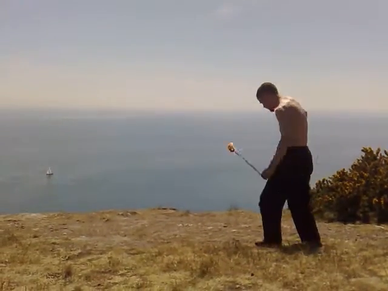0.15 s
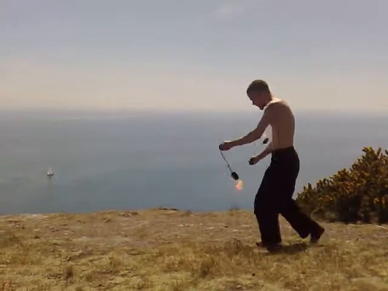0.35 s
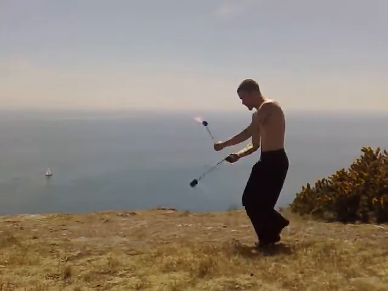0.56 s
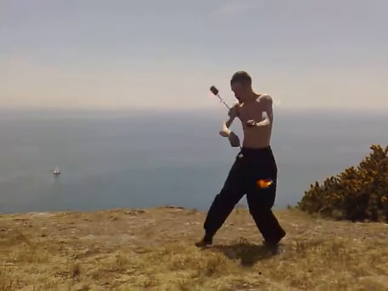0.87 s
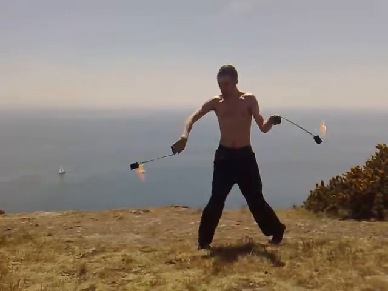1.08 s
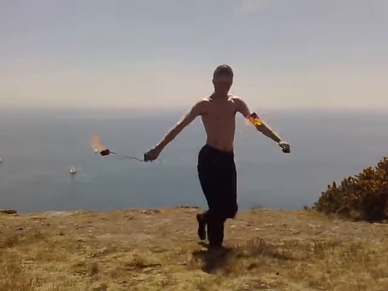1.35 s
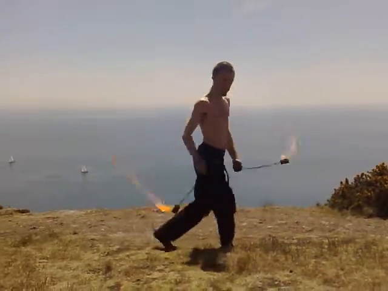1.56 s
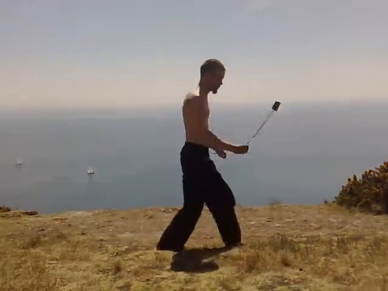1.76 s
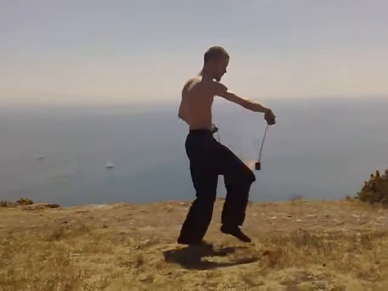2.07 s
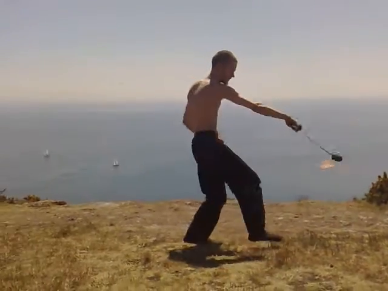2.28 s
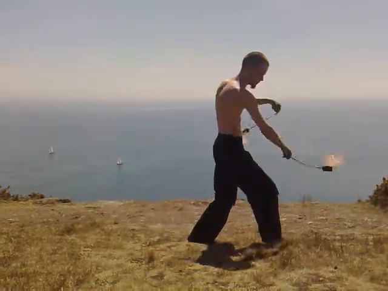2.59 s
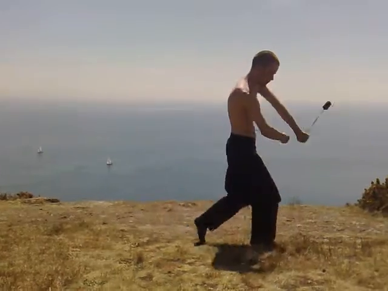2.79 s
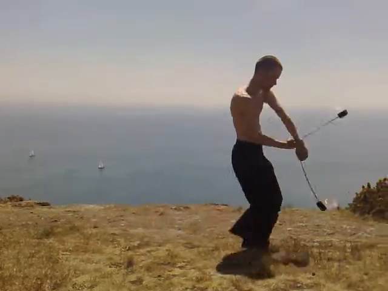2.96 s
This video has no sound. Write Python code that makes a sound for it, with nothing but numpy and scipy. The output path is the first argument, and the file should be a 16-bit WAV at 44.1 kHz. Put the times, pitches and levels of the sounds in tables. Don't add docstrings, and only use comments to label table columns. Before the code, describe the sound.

Spinning fire whooshes past in fluttering low gusts, roaring and tearing with each fast swing.

```python
import sys
import numpy as np
from scipy import signal
from scipy.io import wavfile

SR = 44100
rng = np.random.default_rng(int(sys.argv[2]) if len(sys.argv) > 2 else 0)


def attenuation_scalar(level_db):
    decades = np.asarray(level_db, float) / 20
    return 10 ** decades


def int16_out(signal):
    q = np.round(np.clip(np.atleast_2d(signal).T, -1, 1) * 32767)
    wavfile.write(sys.argv[1], SR, q.astype(np.int16))


N = 138033

# t/s, level/dB
TEARING_SWING = [(0.0, -52.5), (0.12, -60), (0.3, -48), (0.38, -65.5), (0.59, -65), (0.69, -50.5),
                 (0.97, -45.5), (1.08, -49.5), (1.13, -43), (1.66, -66.5), (1.72, -50.5), (1.9, -41),
                 (2.07, -56.5), (2.25, -51.5), (2.53, -63), (2.89, -59.5), (2.93, -49.5), (3.13, -54)]


def rms_one(x):
    return x / np.sqrt(np.mean(x ** 2) + 1e-20)


def in_time(rows):
    s, *columns = np.transpose(rows)
    return [np.interp(np.arange(N) / SR, s, column) for column in columns]


def lowpass(x, cut_hz, run=signal.sosfilt):
    return run(signal.butter(2, cut_hz, fs=SR, output="sos"), x)


def drift(rate):
    r = np.exp(-40 * np.pi * rate / SR)
    white = rng.standard_normal(N // 20 + 4002)
    slow = signal.lfilter([1], [1, -2 * r, r * r], white)[4000:]
    return np.interp(np.arange(N) / 20, np.arange(len(slow)), rms_one(slow))


def banded(colour, shared_db, own_db, grain_db, rate):
    hz, db = np.transpose(colour)
    band_edges = 18 * 2 ** np.arange(0, 10.1, 1 / 3)
    white = rng.standard_normal((2, N + 8000))
    together = shared_db * drift(rate) + grain_db * drift(120)
    out = 0
    for k, (low, high) in enumerate(zip(band_edges, band_edges[1:])):
        own = own_db * drift(rate)
        if hz[0] * .8 < low < hz[-1] * 1.1:
            sos = signal.butter(2, [low, high], "band", fs=SR, output="sos")
            band = signal.sosfilt(sos, white[k % 2])[8000:]
            colour_db = np.interp(np.log(low * high) / 2, np.log(hz), db)
            out = out + band * attenuation_scalar(colour_db + together + own)
    return rms_one(out)


def pulse(width_s):
    t = np.arange(-600, 601) / SR / width_s
    bump = np.exp(-np.abs(t) ** 1.6)
    dip = np.exp(-((t - .6) / 2.8) ** 2)
    shape = bump - dip * bump.sum() / dip.sum()
    return shape / shape.max()


def ground(x):
    # t/s, first notch f/Hz, echo level/dB
    turf_echo = [(0, 463, -8), (.2, 535, -6.5), (.65, 540, -3.5), (.8, 465, -12), (1.3, 516, -20),
                 (1.42, 580, -1.5), (1.58, 389, -3), (1.75, 510, 1), (1.95, 474, -18), (2.15, 417, 3),
                 (2.28, 480, -17), (2.37, 543, -10.5), (2.62, 335, -5.5), (2.88, 560, 4), (2.97, 500, -22),
                 (3.13, 392, 10)]
    notch_hz, echo_db = in_time(turf_echo)
    dull = lowpass(x, 850, signal.sosfiltfilt)
    delay = SR / (2 * notch_hz)
    late = np.interp(np.arange(N) - delay, np.arange(N), dull)
    return x + attenuation_scalar(np.minimum(echo_db, 0)) * late


def preamp_hiss():
    # f/Hz, level/dB per Hz
    hiss_colour = [(300, 6), (3000, 4), (6000, 2), (9500, -1.5), (13000, 0), (16100, 0)]
    rip_db, = in_time(TEARING_SWING)
    hiss_db = -64 + .085 * (rip_db + 56)
    return attenuation_scalar(hiss_db) * banded(hiss_colour, shared_db=.16, own_db=.6, grain_db=-1.1, rate=14)


def chain_ticks():
    # t/s, peak level/dB
    knocks = [
        (1.8925, -28),
        (3.063, -44),
        (3.104, -47),
    ]
    # f/Hz, level/dB, t60/s
    link_modes = [(2600, 0, .009), (3400, -4, .005), (4100, 0, .008), (5200, -11, .004), (6200, -14, .005),
                  (8300, -24, .004)]
    clicks = np.full(N, 1e-18)
    for s, db in knocks:
        clicks[int(s * SR)] = attenuation_scalar(db)
    clicks = lowpass(clicks, 6000)
    out = 0
    for hz, db, t60 in link_modes:
        r, w = attenuation_scalar(-60 / (t60 * SR)), 2 * np.pi * hz / SR
        ring = signal.lfilter([0, np.sin(w)], [1, -2 * r * np.cos(w), r * r], clicks)
        out = out + attenuation_scalar(db - 3) * ring
    return out


def chain_whistles():
    # t/s, length/s, f/Hz, level/dB
    chirps = [
        (.317, .03, 4100, -58),
        (.678, .045, 2790, -53),
        (.695, .012, 3250, -57),
        (.66, .05, 980, -52),
        (1.105, .04, 3200, -56),
        (1.715, .025, 2720, -54),
        (2.689, .016, 880, -44),
        (2.722, .016, 3150, -60),
        (3.044, .014, 2750, -54),
        (3.013, .012, 2600, -54),
    ]
    rough_db, waver_rad, fade_s = 4.5, .8, .004
    t, out = np.arange(N) / SR, np.zeros(N)
    wobble, waver = drift(110), drift(100)
    for s, length, hz, db in chirps:
        shape = np.clip(np.minimum(t - s, s + length - t) / fade_s, 0, 1)
        tone = np.sin(2 * np.pi * hz * t + waver_rad * waver)
        out += shape * attenuation_scalar(db + rough_db * wobble) * tone
    return out


def roar_and_tear():
    # t/s, level/dB
    roar_swing = [(0.0, -43), (0.02, -43.5), (0.09, -50.5), (0.36, -47), (0.59, -63.5), (0.68, -45.5),
                  (0.74, -49.5), (1.16, -43.5), (1.63, -58.5), (1.81, -44), (2.04, -44.5), (2.25, -43.5),
                  (2.51, -58), (2.72, -49), (2.83, -49.5), (2.95, -44.5), (2.97, -49), (3.13, -45.5)]
    # t/s, peak level/dB
    flares = [(0.0094, -40), (0.176, -41.5), (0.3002, -48), (0.6784, -39), (0.782, -37.5), (0.8414, -30.5),
              (0.9194, -35), (1.1044, -43), (1.148, -29.5), (1.2195, -32), (1.309, -34.5), (1.4232, -36.5),
              (1.719, -47), (1.7649, -54), (2.1046, -40), (2.2114, -48), (2.3665, -37.5), (2.5326, -49),
              (2.6884, -41), (2.916, -32), (2.9494, -50), (3.0135, -50)]
    # f/Hz, level/dB per Hz
    roar_colour = [(200, -50), (350, 1), (700, 1.5), (1050, -2.5), (1350, -12.5), (2200, -23.5),
                   (4000, -65)]
    tear_colour = [(250, -11), (450, -2), (1000, -0.5), (1800, 3), (2600, -3.5), (4200, -10), (5500, -41),
                   (9000, -38.5)]
    rise_s, fall_s, flare_db = .0037, .027, -9
    roar_db, = in_time(roar_swing)
    rip_db, = in_time(TEARING_SWING)
    t, flare_power = np.arange(N) / SR, np.zeros(N)
    for s, db in flares:
        u = np.maximum(t - s, 0)
        burst = (1 - np.exp(-u / rise_s)) * np.exp(-u / fall_s)
        flare_power += attenuation_scalar(2 * (db + flare_db)) * burst ** 2
    roar = banded(roar_colour, shared_db=-.06, own_db=2, grain_db=1.3, rate=14)
    roar = roar * np.sqrt(attenuation_scalar(2 * (roar_db + 2.18)) + flare_power)
    tear = banded(tear_colour, shared_db=1, own_db=2.1, grain_db=1, rate=31.4)
    tear = tear * np.sqrt(attenuation_scalar(2 * (rip_db + 1.5)) + flare_power)
    return ground(roar) + tear


def flapping():
    # t/s, level/dB, quick part over slow part/dB
    flap_swing = [(0, -39.5, 3), (.07, -35.5, -5), (.35, -38.5, -4.5), (.59, -46, -4), (.65, -36, -4.5),
                  (.85, -38, -2.5), (1.14, -36.5, -1.5), (1.4, -41.5, -7), (1.58, -47, -15),
                  (1.71, -41, -10), (1.79, -35.5, -2), (1.92, -32.5, -1), (2.2, -40.5, -8),
                  (2.28, -35.5, 2), (2.5, -43.5, -5.5), (2.64, -47.5, -20), (2.91, -36, 1.5),
                  (3.13, -39, -7)]
    # t/s, peak level/dB
    big_flaps = [(0.091, -25.6), (0.201, -27.2), (0.244, -27.6), (0.362, -28.8), (0.441, -31.3),
                 (0.539, -33.9), (0.72, -24.5), (0.895, -28.0), (1.088, -24.5), (1.127, -26.1),
                 (1.165, -26.3), (1.232, -25.2), (1.332, -30.9), (1.432, -30.1), (1.441, -24.1),
                 (1.616, -30.9), (1.884, -23.3), (2.014, -24.9), (2.183, -29.6), (2.267, -24.9),
                 (2.377, -27.7), (2.549, -30.5), (2.697, -34.8), (2.892, -28.5), (2.912, -27.8),
                 (3.011, -26.8), (3.085, -22.4)]
    # f/Hz, level/dB per Hz
    slow_colour = [(18, -32), (30, -25.5), (60, -8.5), (95, -4), (150, -4.5), (230, -10.5), (400, -19)]
    quick_colour = [(70, -22), (130, -8.5), (200, 5.5), (280, -2), (450, -11.5), (800, -26)]
    flaps_per_s, spread_db, bump_share = 260, 1.6, .18
    flap_width_s, duck_s, duck_depth = .0015, .008, .8
    level_db, quick_db = in_time(flap_swing)

    sizes = attenuation_scalar(spread_db * np.minimum(rng.exponential(1, N), 4))
    small_flaps = sizes * (rng.random(N) < flaps_per_s / SR)
    bumps = signal.fftconvolve(small_flaps, pulse(flap_width_s * 1.48), "same")
    bumps = rms_one(lowpass(bumps, 240, signal.sosfiltfilt))
    slow = banded(slow_colour, shared_db=2.45, own_db=.07, grain_db=.7, rate=7.7)
    quick = banded(quick_colour, shared_db=-3.5, own_db=.5, grain_db=-.5, rate=37)
    bed = np.sqrt(bump_share) * bumps + np.sqrt(1 - bump_share) * slow
    bed = bed + attenuation_scalar(quick_db) * ground(quick) / 2

    t, marks, room = np.arange(N) / SR, np.zeros(N), np.ones(N)
    for s, db in big_flaps:
        marks[int(s * SR)] = attenuation_scalar(db + 2.2)
        room = room * (1 - duck_depth * np.exp(-((t - s) / duck_s) ** 2))
    big = signal.fftconvolve(marks, pulse(flap_width_s), "same")
    return attenuation_scalar(level_db + 1) * bed * room + big


def scene():
    chains = chain_ticks() + chain_whistles()
    fire = roar_and_tear() + flapping()
    return (preamp_hiss() + chains + fire)[None]


def roll_off(x):
    return signal.sosfilt(signal.butter(12, 16640, fs=SR, output="sos"), x)


def record(dry):
    ceiling, cutoff_hz = .13, 15820
    rounded = ceiling * np.tanh(dry / ceiling)
    steep = signal.ellip(12, .5, 60, cutoff_hz - 120, fs=SR, output="sos")
    return roll_off(signal.sosfilt(steep, rounded))


dry = scene()
out = record(dry)
int16_out(out)
```